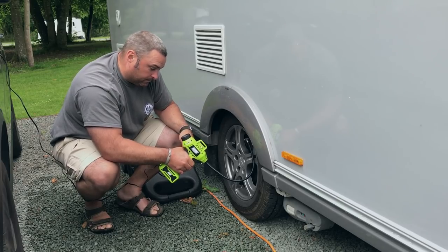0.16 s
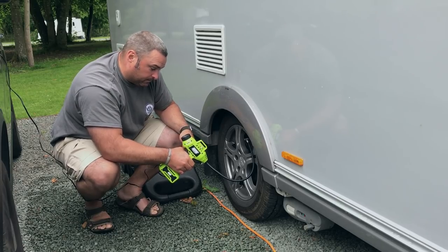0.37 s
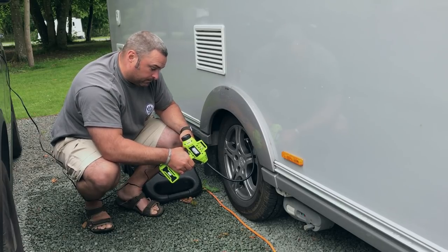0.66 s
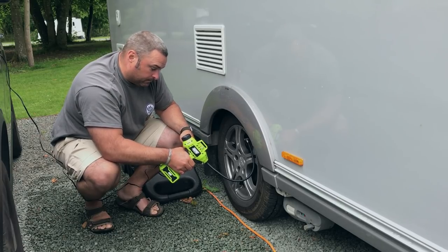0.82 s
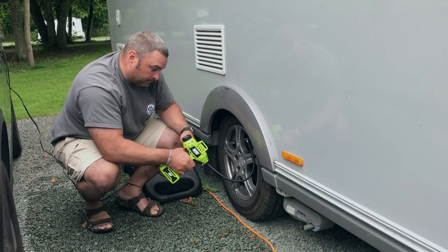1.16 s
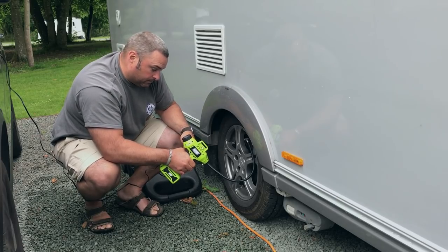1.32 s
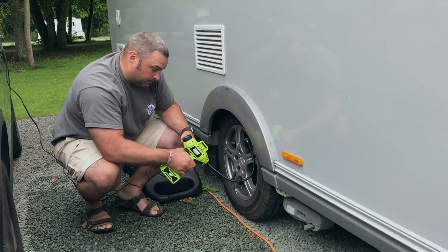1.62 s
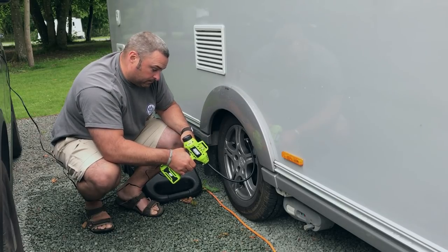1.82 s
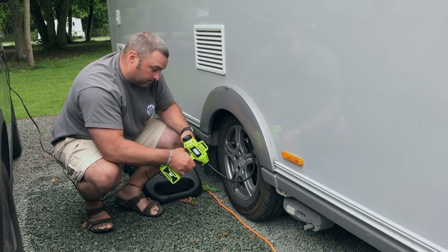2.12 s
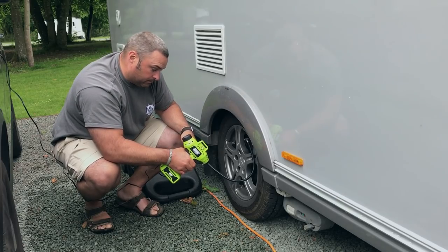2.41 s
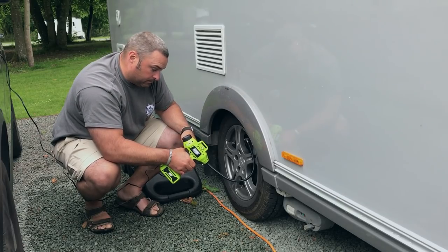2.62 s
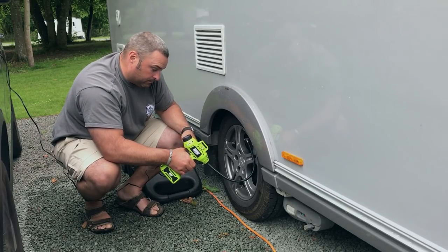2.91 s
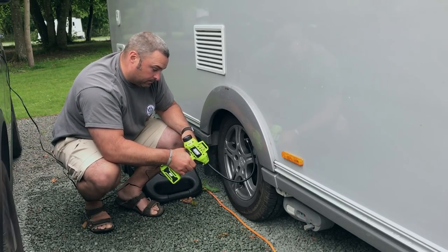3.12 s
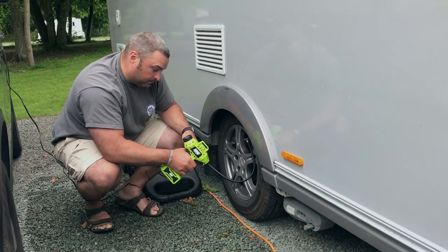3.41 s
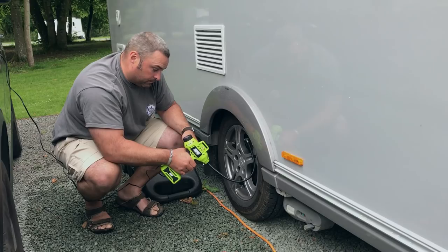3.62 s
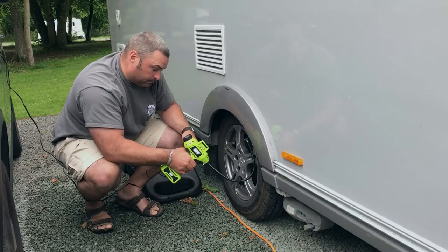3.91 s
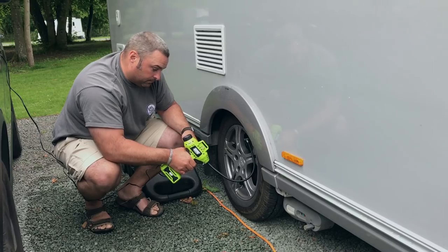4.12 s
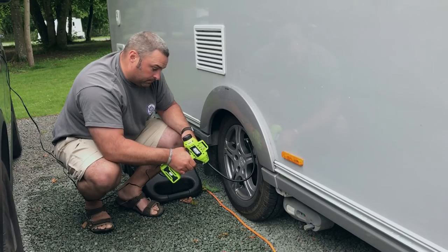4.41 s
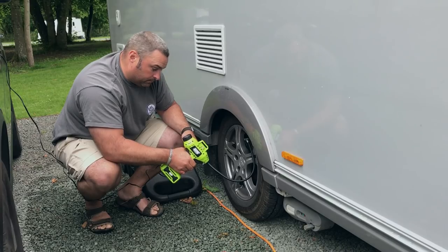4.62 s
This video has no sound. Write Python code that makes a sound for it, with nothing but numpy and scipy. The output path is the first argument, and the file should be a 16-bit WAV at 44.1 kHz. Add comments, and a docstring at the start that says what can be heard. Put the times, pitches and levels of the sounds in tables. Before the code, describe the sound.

From 0 to about 4.75 seconds, a small electric piston compressor pumps a tyre outdoors, already at full speed when the sound begins and still running when it cuts off. Roughly forty strokes a second blur into a coarse, nasal, rattling buzz, strongest in the midrange around 900 hertz. Each stroke carries a casing thump, a cluster of hard metallic knocks from about 1.6 to 6 kilohertz, and a thin puff of valve hiss higher up. A motor whine near 950 hertz and gears singing around 2.1 kilohertz pulse within every turn, and the gritty rattle flutters subtly about seven times a second. Speed sags very slightly, with small dips near 1.2, 3.7 and 4.35 seconds, each followed by recovery. Level rises by barely half a decibel overall. Faint low wind rumble lies beneath. Close, dry, single-channel sound without reverberation.

```python
"""Outdoors, in light wind: a small piston compressor pumps a tyre, heard dry at the microphone, no distance modelled.
A motor with an 11-tooth pinion turns a 53-tooth crank wheel. Each turn thumps the casing (filtered pulses), knocks
valve and gear parts at set crank angles (short decaying sines) and puffs air through the valves (gated noise).
The gears sing under load and the commutator whines (tones locked to the crank), hurrying and slowing within
each turn; broad noise makes the rattle, and part of its pattern returns every 11 turns."""
import sys
import numpy as np
from scipy.fft import rfft, irfft, next_fast_len
from scipy.io import wavfile
from scipy.ndimage import uniform_filter1d, map_coordinates

SR = 44100
rng = np.random.default_rng(int(sys.argv[2]) if len(sys.argv) > 2 else 0)


def unload_audio(sound):
    """Save the sound as a 16-bit wav file, at the path given as the first command line argument."""
    columns = np.transpose(np.atleast_2d(sound))
    # keep every value between -1 and 1, then stretch to whole-number steps
    steps = np.round(np.clip(columns, -1, 1) * 32767)
    wavfile.write(sys.argv[1], SR, steps.astype(np.int16))


N = 209739

# Crank speed, sagging with the load and recovering: t/s, speed/(turns per s)
CRANK_SPEED = [(0, 39.782), (.399, 40.024), (.496, 39.796), (.935, 39.789), (1.189, 39.351), (1.24, 39.865),
               (1.325, 39.907), (2.41, 39.487), (2.49, 39.629), (3.216, 39.369), (3.366, 39.471),
               (3.676, 39.094), (3.945, 39.567), (4.005, 39.442), (4.243, 39.508), (4.348, 39.134),
               (4.445, 39.8), (4.756, 39.8)]
# Casing answer to one stroke: f/(multiple of the crank speed), rms level/dB
CASING_ORDERS = [(1, -45.5), (2, -46), (3, -46.5), (4, -62), (5, -46), (6, -61.5), (7, -53.5), (8, -50.5),
                 (9, -44.5), (10, -45.5), (11, -39.5), (12, -35.5), (13, -50.5), (14, -43.5), (15, -47.5),
                 (16, -54.5), (17, -50.5), (18, -40), (19, -49.5), (20, -38.5), (21, -34.5), (22, -35),
                 (23, -32), (24, -34.5), (25, -40.5), (26, -54), (27, -49.5), (28, -54.5), (29, -52.5),
                 (30, -54), (31, -48.5), (32, -41.5), (33, -41.5), (34, -45.5), (35, -50.5), (36, -60),
                 (38, -100)]
# How late each part of the stroke's sound swells: f/Hz, lag/ms
CASING_LAG = [(40, -0.3), (330, 1.0), (400, 9.4), (500, 7.8), (600, 8), (655, -12), (695, 12), (735, -6),
              (760, 1.5), (860, 3.3), (880, 6.6), (1044, 9.8), (1145, -3.8), (1277, 5.8), (1400, 5.9)]
# Parts rung once a turn: crank angle/turns, f/Hz, mean peak level/dB, rise/ms,
# scale of phase scatter/cycles, sway with the gear beat/dB
KNOCKING_PARTS = [(.7, 900, -34, 4.5, .05, 0.2), (-.02, 3990, -37, 2, .1, 1),
                  (.275, 12900, -43, .35, .3, 0.2), (.355, 12900, -43, .35, .3, 0.2),
                  (.345, 9670, -43, .6, .25, 0.2), (.08, 2150, -35, 2.5, .1, 4),
                  (.05, 2430, -33, 2.5, .08, 1.8), (.66, 2400, -42, 2, .1, 4), (.0, 1640, -37, 2.5, .1, 4),
                  (.14, 1640, -40, 3, .1, 5), (.72, 1630, -37.5, 3, .1, 2), (.92, 2950, -32.5, 3.3, .1, 4),
                  (.0, 2770, -41, 3, .1, 3), (-.04, 3480, -33, 2, .12, 3.5),
                  (-.01, 3780, -33, 1.8, .08, 1.8), (.76, 3740, -35, 2.5, .1, 1.5),
                  (.76, 3990, -33.5, 2.5, .08, .7), (.34, 3650, -38, 2, .1, 4), (.2, 4220, -37, 3, .1, 1),
                  (.72, 4250, -40, 2.5, .1, 2), (.52, 4690, -40, 3, .12, -4),
                  (.84, 4700, -36, 2.6, .12, 2.5), (.1, 4690, -43, 3, .15, 2), (.6, 5340, -41, 2.6, .15, 2),
                  (-.02, 5200, -38, 2, .15, 1.5), (.86, 4940, -36, 2.2, .15, 2.5),
                  (.73, 5860, -37, 2.2, .15, 2.5), (.73, 6040, -35, 2.4, .15, 2)]
# As the pressure builds some parts ring harder, others softer: f/Hz, level slope/(dB per s)
PRESSURE_BUILD = [(1620, -2), (2100, 0.5), (2950, 0.2), (3500, -1.2), (3750, 1.7), (4200, 0), (4900, 0.5),
                  (6000, -0.5)]
# Valve hiss resonances: f/Hz, width/Hz, relative level/dB
VALVE_MODES = [(7300, 360, -7.5), (8610, 110, -2.5), (8960, 280, -12), (9700, 240, 0.5), (10400, 270, -4),
               (11600, 400, -5.5), (12600, 390, -6.5), (13020, 380, -4.5)]
# Puffs of valve hiss: crank angle/turns, width/turns, level/dB
VALVE_PUFFS = [(0.3, 0.19, -39), (.2, .012, -51), (0.26, .012, -46), (0.37, 0.0095, -40), (.8, .3, -53.5)]
# Spectrum shape of the rattle between the knocks: f/Hz, relative level/dB
RATTLE_SPECTRUM = [(20, -29), (100, -12), (250, -14.5), (500, -14), (900, -2), (1200, -5), (2100, -6.5),
                   (3700, -7), (5500, -9), (6200, -15), (10000, -21), (13500, -22.5), (14500, -21),
                   (16000, -33)]
# Housing resonances that the rattle sings through: f/Hz, width/Hz, relative level/dB
HOUSING_MODES = [(1630, 40, -4), (2120, 140, -4), (2440, 60, -3), (2770, 40, -6), (2940, 90, -5),
                 (3480, 70, -4), (3600, 70, -5), (3780, 90, -3), (3990, 55, -3), (4220, 60, -5),
                 (4690, 60, -4), (4930, 60, -5), (5100, 80, -9), (5340, 120, -9), (6030, 150, -16)]
# Loaded stretches of the gear mesh: crank angle/turns, width/turns, peak level/dB
MESH_LOADS = [(0.86, 0.071, -22.5), (0.51, 0.11, -32)]

PINION_TEETH = 11
GEAR = 53 / PINION_TEETH  # motor turns per crank turn
BARS = 5  # commutator cycles per motor turn
MESH_ORDER = 54  # mesh cycles per crank turn
NOMINAL = 39.6  # typical crank speed, turns per s
TOP_HZ = 15725  # band limit


def amp(db):
    """Gain of a level in dB."""
    return 10 ** (np.asarray(db) / 20)


def unit(x):
    """Scaled to rms 1."""
    return x / np.sqrt(np.mean(x ** 2))


def wobble(rate):
    """A smooth random curve with rate knots a second."""
    knots = rng.standard_normal(int(N * rate / SR) + 4)
    return map_coordinates(knots, [np.arange(N) * rate / SR])


def filtered(x, response):
    """x through a complex response of frequency in Hz."""
    m = next_fast_len(N + SR // 2)  # spare room for the tail
    spectrum = rfft(x, m) * response(np.fft.rfftfreq(m, 1 / SR))
    return irfft(spectrum, m)[:N]


def resonances(modes, f):
    """Complex response of a set of resonant modes, summed with alternating sign."""
    total = 0
    for k, (centre, width, db) in enumerate(modes):
        damping = 1j * f * width
        total = total + (-1) ** k * amp(db) * damping / (centre * centre - f * f + damping)
    return total


def crank():
    """Crank angle in turns at every sample: the running sum of the speed."""
    t, speed = np.transpose(CRANK_SPEED)
    return np.cumsum(np.interp(np.arange(N) / SR, t, speed)) / SR


def power_in_turn(bumps, angle):
    """Power of Gaussian bumps that come round at set crank angles."""
    power = 0
    for turn, width, db in bumps:
        distance = (angle - turn + .5) % 1 - .5  # the shorter way round
        power = power + amp(db) ** 2 * np.exp(-(distance / width) ** 2 / 2)
    return power


def gear_beat(angle):
    """The pinion meets each stroke 2/11 of a turn further back, so gear sounds sway about 7 times a second."""
    return np.cos(2 * np.pi * (.07 + (GEAR - 5) * angle))


def breeze():
    """Light wind rumbles on the microphone: low noise, slowly unsteady."""
    low = unit(filtered(rng.standard_normal(N), lambda hz: hz / (1 + (hz / 50) ** 3.05)))
    return amp(-50.5 + 1.5 * wobble(4)) * low


def rattle(angle):
    """Broad gear noise that throbs with the crank; the part due to tooth shape returns with the teeth."""
    hz, db = np.transpose(RATTLE_SPECTRUM)
    steps = 1100  # roughness points per crank turn
    cycle = PINION_TEETH * steps  # wheel and pinion meet alike again after 11 turns
    place = (angle * steps).astype(int)
    wheel = .3 * rng.standard_normal(steps)[place % steps]
    pairing = .42 * rng.standard_normal(cycle)[place % cycle]
    rough = wheel + pairing + 0.46 * rng.standard_normal(N)

    def housing(f):
        modes = resonances(HOUSING_MODES, f)
        return modes * np.abs(modes) ** 0.06  # peaks slightly sharpened
    broad = unit(filtered(rough, lambda f: amp(np.interp(np.log(f + 1), np.log(hz), db))))
    noise = amp(-2.0) * broad + amp(-9.0) * unit(filtered(rough, housing))
    top = np.cos(2 * np.pi * (angle - .05))  # loudest just after the top of the stroke
    level_db = -31.0 + 0.68 * top + 0.17 * (1.0 + top) * gear_beat(angle)
    return amp(level_db) * noise


def hiss(angle):
    """Air puffs through the valves at set crank angles: resonant noise gated by the flow."""
    flow = power_in_turn(VALVE_PUFFS, angle)
    air = unit(filtered(rng.standard_normal(N), lambda f: resonances(VALVE_MODES, f) * (f > 6500)))
    return np.sqrt(flow) * amp(0.9 * wobble(24.53)) * air


def whine(angle):
    """Commutator tone: the shaft slows at the top of the stroke, and the tone sinks and fades with it."""
    hurry = -1.2 * np.sin(2 * np.pi * angle)  # radians
    load = 1 - .3 * np.cos(2 * np.pi * angle)
    tone = load * np.cos(2 * np.pi * (BARS * GEAR * angle - .06) + hurry)

    def shell(hz):
        peak = amp(4 * np.exp(-((hz - 995) / 25) ** 2))
        return peak / (1 + (hz / 1018) ** 60)  # steep fall above
    return amp(-34.5 + .5 * wobble(8)) * filtered(tone, shell)


def mesh(angle):
    """The gears sing near their tooth rate, loudest under compression, where the tone sinks as the crank slows."""
    load = power_in_turn(MESH_LOADS, angle)
    # phase offsets in cycles
    lead = .2 * np.cos(2 * np.pi * (angle - .72)) + .05 * np.cos(4 * np.pi * (angle - .85))
    unsteady = .06 * wobble(5) + .035 * wobble(60)
    swell_db = 0.48 * gear_beat(angle) + 1.2 * wobble(70) + np.linspace(-.7, .7, N)
    tone = np.cos(2 * np.pi * (MESH_ORDER * angle + lead + unsteady))
    return np.sqrt(load) * amp(swell_db) * tone


def knocks(angle):
    """Each part swells and dies; its strength follows the gear beat, its phase wanders over a few turns."""
    out, pad = np.zeros(N + 2 * SR), SR // 2
    # crank angle carried back before the start, so that earlier knocks ring in
    run_in = np.interp(np.arange(-pad, N), [-pad, 0], [-pad * NOMINAL / SR, 0])
    track = run_in + np.pad(angle, (pad, 0))
    for turn, hz, db, rise_ms, scatter, sway_db in KNOCKING_PARTS:
        when = np.arange(-1, int(angle[-1]) + 1) + turn
        chance = rng.standard_normal((len(when), 4))
        drift = unit(uniform_filter1d(chance[:, 3:], size=7, axis=0))  # over 7 turns

        at = np.interp(when, track, np.arange(len(track)), right=N + SR)  # beyond the end: cut off
        cell = np.ceil(at)[:, None] + np.arange(SR // 50)  # 20 ms of samples for each knock
        t = (cell - at[:, None]) / SR
        u = t * 1000 / rise_ms
        swell = (u * np.exp(1 - u)) ** 2  # peaks at 1 after the rise

        slope = np.interp(hz, *np.transpose(PRESSURE_BUILD))
        gained_db = slope * (when[:, None] - when.mean()) / NOMINAL
        sway = sway_db * gear_beat(when)[:, None]
        size = amp(db + gained_db + sway + 0.59 * chance[:, :1])

        pitch = hz * (1 + 0.0025 * chance[:, 1:2])
        phase = scatter * (0.46 * chance[:, 2:3] + 1.08 * drift)
        ring = np.sin(2 * np.pi * (pitch * t + phase))
        out += np.bincount(cell.astype(int).ravel(), (size * swell * ring).ravel(), len(out))
    return out[pad:pad + N]


def strokes(angle):
    """One pulse a turn, a little uneven in time and strength, through the casing."""
    turns = np.arange(int(angle[-1]) + 1)
    chance = rng.standard_normal((len(turns), 2))
    at = np.interp(turns, angle, np.arange(N)) + 0.61 * chance[:, 0]  # samples
    # windowed sinc places each pulse between samples
    near = np.round(at)[:, None] + np.arange(-8, 9)
    offset = near - at[:, None]
    taps = np.sinc(offset) * np.cos(np.pi * offset / 18) * amp(.4 * chance[:, 1:])
    pulses = np.bincount(np.clip(near, 0, N - 1).astype(int).ravel(), taps.ravel(), N)
    order, db = np.transpose(CASING_ORDERS)
    lag_hz, ms = np.transpose(CASING_LAG)

    def casing(hz):
        lag = np.interp(hz, lag_hz, ms / 1000)
        phase = 2 * np.pi * np.cumsum(lag) * hz[1]  # lag summed over frequency; hz[1] is the bin step
        level = amp(np.interp(hz / NOMINAL, order, db)) * (hz > NOMINAL / 2)
        return level * np.exp(-1j * phase)
    return filtered(pulses, casing) * SR / NOMINAL / np.sqrt(2)  # pulse train to rms per harmonic


def scene():
    """The whole machine in the breeze, growing slightly louder as the pressure builds."""
    angle = crank()
    machine = strokes(angle) + knocks(angle) + whine(angle) + mesh(angle) + hiss(angle) + rattle(angle)
    build = amp(np.linspace(-.3, .3, N))
    return (machine * build + breeze())[None]


def record(dry):
    """One microphone channel; nothing is kept above the band limit."""
    return filtered(dry[0], lambda hz: hz < TOP_HZ)[None]


dry = scene()
out = record(dry)
unload_audio(out)
```